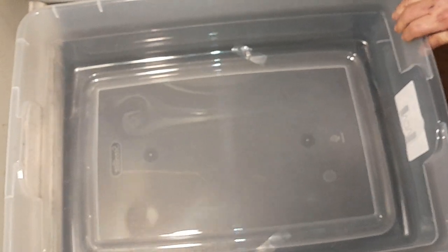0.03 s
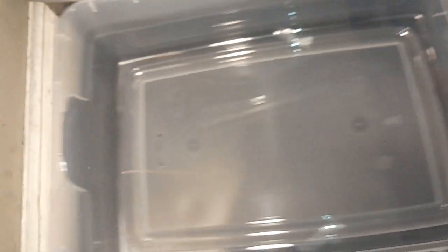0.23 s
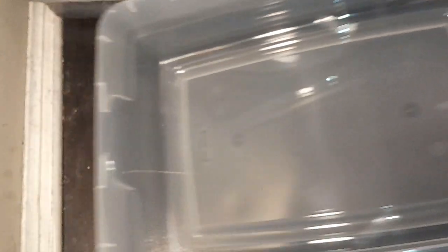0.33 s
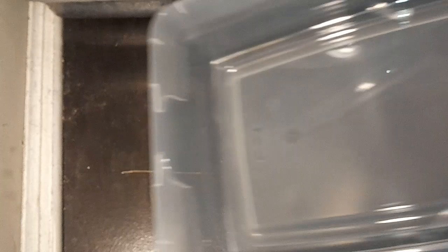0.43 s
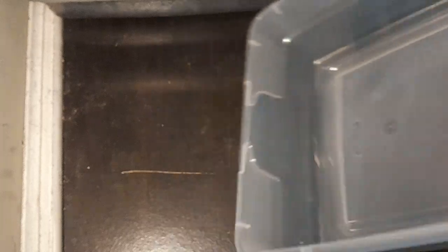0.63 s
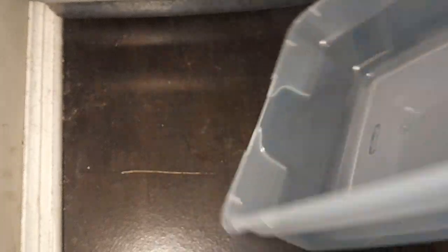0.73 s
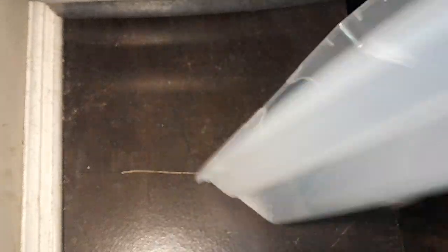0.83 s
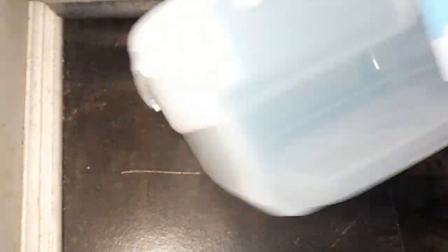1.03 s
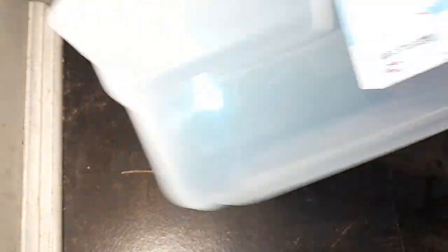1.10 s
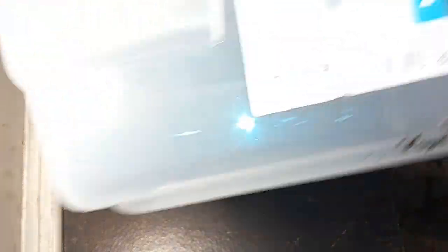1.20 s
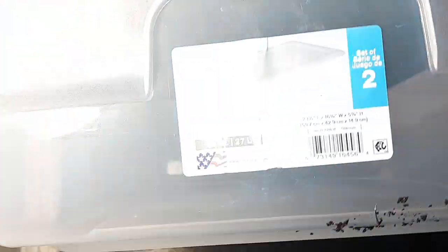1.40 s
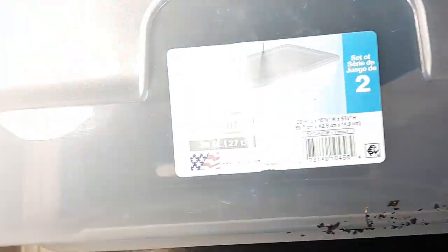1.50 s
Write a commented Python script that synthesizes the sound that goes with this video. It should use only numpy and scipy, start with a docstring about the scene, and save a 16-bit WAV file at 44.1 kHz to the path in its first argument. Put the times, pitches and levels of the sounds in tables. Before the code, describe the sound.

Hard plastic tub bumps loose, rubs with a gritty scrape and low shudder, then thuds twice.

```python
"""Plastic bin dragged and tipped

A large thin plastic bin bumps free of a hard surface close to two microphones and is turned on its side.
Bumps and two hollow knocks ring its panel modes; its base scrapes as dense, gritty noise grains.
Coarser catches rub the walls and boom the floor panel; a wall judders in stick-slip near 200 Hz.
Small settling rubs follow, with short room reflections over a quiet noise bed."""
import sys
import numpy as np
from scipy import signal
from scipy.fft import rfft, irfft, next_fast_len
from scipy.io import wavfile
from scipy.ndimage import map_coordinates

SR = 44100
rng = np.random.default_rng(int(sys.argv[2]) if len(sys.argv) > 2 else 0)


def store_wav(level_fs):
    """Save 16-bit WAV to argv[1]."""
    pcm = np.round(np.clip(np.atleast_2d(level_fs), -1, 1) * 32767)
    wavfile.write(sys.argv[1], SR, pcm.T.astype(np.int16))


def elevation(decibels):
    """Turn decibel levels (scalar or array-like) into linear amplitude ratios."""
    levels = np.asarray(decibels, float)
    return 10 ** (levels / 20)


N = 68355  # samples

# Room tone spectrum: f/Hz, relative level/dB
ROOM_TONE = [(18, -35), (30, 12), (59, 6.5), (321, -19), (785, -1), (2080, -22), (7750, -12), (16200, -50)]
# Brief dips of the room tone: t/s, width/s, level/dB
ROOM_TONE_DIPS = [(0.057, 0.028, -20), (.848, 0.0071, -11)]
ROOM_TONE_DB = -61.5
# Room decay: f/Hz, t60/s
ROOM_DECAY = [(100, 0.33), (1000, 0.22), (10000, 0.34)]
ROOM_DB = -11

# Left-right likeness: f/Hz, correlation (0 to 1)
LIKENESS = [(60, 0.99), (200, 1), (500, 0.81), (1500, 0.052), (8000, 0.031)]
# Left over right: f/Hz, level/dB
LEFT_OVER_RIGHT = [(60, 3.2), (240, 3.2), (950, 4.5), (3770, 3), (15000, 1)]
# The bin crosses the microphones: t/s, left lag/s
LEFT_LAG = [(.1, -.0002), (.7, 0), (1.5, .0005)]
LOW_CUT_HZ, BAND_END_HZ = 30, 15750

# The bin's panel modes, lowest first: f/Hz, relative level/dB, t60/s
PANEL_MODES = [(53.9, 0, 0.35), (81.7, 4, 0.27), (147, -0.5, 0.14), (193.2, 1.5, 0.061),
               (228.7, -2.5, 0.071), (352, -6, 0.081), (445.4, -10, 0.038), (560, -11.5, 0.027),
               (677.7, -7, 0.034), (927, -13.5, 0.033), (1070, -13, 0.032), (1225, -15.5, 0.021),
               (1470, -16, 0.011)]
FLOOR_MODES = 3  # this many of the lowest modes carry the boom
WALL_MODES_FROM = FLOOR_MODES + 1  # index of the first mode rubbed or juddered

# Wall rub, before its lumps: t/s, level/dB
WALL_RUB = [(0, -44.5), (.06, -62), (.14, -45.5), (.2, -52), (.3, -34), (.38, -43), (.43, -29), (.49, -42),
            (.535, -42.5), (.65, -41.5), (.76, -49.5), (.81, -76), (.84, -100), (.87, -31.5), (.91, -32),
            (.99, -49.5), (1.06, -37.5), (1.13, -57.5), (1.22, -47), (1.28, -44), (1.39, -62),
            (1.44, -68.5), (1.55, -101)]
RUB_TILT_DB, RUB_LUMPS_DB = 0.5, 2.5  # per octave; scale of the random level wander
# Floor panel boom, before its wander: t/s, level/dB
FLOOR_BOOM = [(0, -33.5), (.055, -44), (.08, -51), (.15, -54), (.2, -30.5), (.3, -31), (.5, -34.5),
              (.56, -24), (.65, -38.5), (.76, -34), (.8, -30), (.85, -41.5), (1.0, -40.5), (1.17, -43),
              (1.29, -43.5), (1.395, -48), (1.415, -75), (1.55, -83)]

# Base scrape, before its clumps: t/s, level/dB
SCRAPE_LEVEL = [(0, -60), (.065, -87.5), (.1, -56.5), (.185, -44), (.205, -87), (.25, -39.5), (.3, -31),
                (.39, -26), (.435, -24.5), (.47, -39), (.52, -46), (.64, -56), (.81, -56.5), (.835, -71.5),
                (.862, -88), (.9, -60), (.99, -52), (1.05, -53), (1.13, -60.5), (1.21, -52.5), (1.28, -54),
                (1.4, -64.5), (1.55, -77)]
# Grit colour: f/Hz, relative level/dB
GRIT_COLOUR = [(180, -56.5), (440, -12), (888, -13.5), (1100, -11.5), (3000, -14), (4200, -18), (7520, -14),
               (9340, -29.5), (13000, -19), (16200, -23)]
# Sheet resonances under the scrape: f/Hz, width/Hz, level/dB
SHEET_RESONANCES = [(444, 30, 15), (1081, 64, 9.5), (1497, 40, 5.5), (2170, 130, 6), (2680, 40, 6),
                    (3660, 690, 3.5)]
GRAINS_PER_S, GRAIN_SPREAD_DB = 15000, 3.5
# The top fizz follows the scrape level less steeply: offset, then dB of fizz per dB of scrape
FIZZ_HZ, FIZZ_DB, FIZZ_FOLLOWS = 11900, -35.5, 0.44

# Stick-slip before jitter and scatter: t/s, slip rate f/Hz, level/dB
JUDDER_PATH = [(.485, 205, -23), (.5, 215.7, -22), (.528, 245.1, -17.5), (.56, 200, -19), (.6, 213.9, -22),
               (.64, 189.5, -25), (.69, 195.6, -27), (.74, 240.6, -25.5), (.78, 207.1, -27.5),
               (0.819, 228.8, -30), (0.836, 220, -47)]
SLIP_JITTER, SLIP_SCATTER_DB = 0.15, 3.2  # scales of the rate (fraction) and level wander
SLIP_RING_DB, SLIP_FIZZ_DB = -8, -52  # ring relative to the judder level; fizz before its wander
SLIP_SOFT_HZ = 580

# Knocks: t/s, level/dB, tilt/(dB per octave), struck part f/Hz, crack level/dB, hand stops it after t/s
BLOWS = [(0.183, -33.5, 4.5, 450, 1, 0.032), (0.212, -25.5, 4, 147, 5, 0.045),
         (0.239, -29.5, 5.5, 147, 3, 0.02), (.526, -40.5, 5.5, 550, 1, 0.038),
         (0.8679, -23.5, 6.5, 1250, -0.5, 0.024), (0.87, -20, 0.5, 192, -4.5, 0.3),
         (1.008, -17.5, 0.5, 863, -8, 0.096), (1.021, -23.5, 2.5, 202.5, -16.5, 0.15),
         (1.266, -38, 3, 1470, -4, 0.039)]
# Crack colour: f/Hz, relative level/dB
CRACK_COLOUR = [(240, -80), (450, -3), (1200, -9.5), (2500, -11.5), (4000, -21), (7500, -23.5), (9500, -34),
                (16000, -34)]
CRACK_T60, CRACK_RING_DB = 0.082, 11.5  # s; lift of the panel modes in the crack's colour
STOP_S, SWELL_CYCLES = 0.0062, 0.35  # time constants of the hand's damping and of each mode's swell
WALL_DB, WALL_OCTAVES = 15, 0.17  # modes near the struck wall ring louder


def unit(x):
    """Scales a signal to rms 1."""
    return x / np.sqrt(np.mean(x ** 2) + 1e-20)


def along(points, hz):
    """Reads (Hz, value) points on a log frequency axis."""
    f, value = np.transpose(points)
    return np.interp(np.log(hz + 1), np.log(f + 1), value)


def curves(rows):
    """One value per sample for each column after the time."""
    s, *columns = np.transpose(rows)
    return [np.interp(np.arange(N) / SR, s, column) for column in columns]


def wobble(rate):
    """A smooth random curve, rate knots a second."""
    knots = rng.standard_normal(int(N * rate / SR) + 4)
    return map_coordinates(knots, [np.arange(N) * rate / SR])


def noise_pair():
    """Two independent draws of white noise."""
    return rng.standard_normal((2, N))


def filtered(x, response):
    """Shapes x by a complex response of frequency."""
    size = next_fast_len(N + SR // 2)
    return irfft(rfft(x, size) * response(np.fft.rfftfreq(size, 1 / SR)), size)[..., :N]


def resonances(f, peaks):
    """Causal sum of (Hz, width Hz, dB) resonances, alternating in sign."""
    total = 0
    for k, (centre, width, db) in enumerate(peaks):
        damping = 1j * f * width
        total = total + (-1) ** k * elevation(db) * damping / (centre * centre - f * f + damping)
    return total


def width_hz(t60):
    """A mode's bandwidth: the faster it dies, the wider it is."""
    return np.log(1000) / np.pi / t60


def grains(per_s, spread_db):
    """Two draws of random tiny impacts of uneven size."""
    hits = rng.random((2, N)) < per_s / SR
    signs = rng.choice([-1, 1], (2, N))
    return hits * signs * elevation(spread_db * rng.standard_normal((2, N)))


def shaken(modes, force, tilt_db):
    """A force played into some of the bin's modes, tilted per octave about 200 Hz, rms 1."""
    peaks = [(hz, width_hz(t60), db + tilt_db * np.log2(hz / 200)) for hz, db, t60 in modes]
    return unit(filtered(force, lambda f: resonances(f, peaks)))


def room_tone():
    """A quiet bed of coloured noise whose level dips briefly."""
    t = np.arange(N) / SR
    dips_db = sum(db * np.exp(-((t - s) / width) ** 2) for s, width, db in ROOM_TONE_DIPS)
    bed = unit(filtered(noise_pair(), lambda f: elevation(along(ROOM_TONE, f))))
    return elevation(ROOM_TONE_DB + dips_db) * bed


def room(x):
    """Delayed noise tail in which each frequency dies at its own speed."""
    hz, t, z = signal.stft(rng.standard_normal((2, SR // 2)), SR, nperseg=256)
    decay = elevation(-60 * t / along(ROOM_DECAY, hz)[:, None])
    tail = signal.istft(z * decay, SR, nperseg=256)[1]
    tail = tail / np.linalg.norm(tail[0])
    delayed = np.pad(x, (300, 0))  # samples
    return signal.fftconvolve(delayed[None], tail, axes=1)[:, :N]


def pair(x):
    """Two microphones hear different parts of the big object: alike in the bass, unlike in the treble."""
    def mid_side_gains(f):
        turn = np.arccos(np.clip(along(LIKENESS, f), -1, 1)) / 2
        return np.array([np.cos(turn), np.sin(turn)])
    mid, side = filtered(x, mid_side_gains)
    half_lag = curves(LEFT_LAG)[0] * SR / 2
    left = map_coordinates(mid + side, [np.arange(N) - half_lag], mode="nearest")
    right = map_coordinates(mid - side, [np.arange(N) + half_lag], mode="nearest")
    return np.array([left, right])


def fizz():
    """Fine hiss at the top of the range, rms 1."""
    return unit(filtered(noise_pair(), lambda f: 1 / (1 + (FIZZ_HZ / (f + 1)) ** 8)))


def floor_boom():
    """Sparse coarse catches shake the floor panel's low modes."""
    panel = shaken(PANEL_MODES[:FLOOR_MODES], grains(400, 3), tilt_db=-2)
    return elevation(curves(FLOOR_BOOM)[0] + 0.79 * wobble(45)) * panel


def wall_rub():
    """Catches coarser than the grit shake the wall modes in lumps."""
    walls = shaken(PANEL_MODES[WALL_MODES_FROM:], grains(2500, 3.34), tilt_db=RUB_TILT_DB)
    return elevation(curves(WALL_RUB)[0] + RUB_LUMPS_DB * wobble(44.9)) * walls


def judder():
    """Stick-slip of a wall: an uneven cycle, each slip a soft kick of its own size into the wall modes."""
    hz, level_db = curves(JUDDER_PATH)
    t = np.arange(N) / SR
    start, end = JUDDER_PATH[0][0], JUDDER_PATH[-1][0]
    on = np.clip(np.minimum(t - start, end - t) / 0.0042, 0, 1)  # fades of 4.2 ms
    turns = np.cumsum(hz * (1 + SLIP_JITTER * wobble(120))) / SR
    cycle = np.array([np.sin(2 * np.pi * turns), np.cos(2 * np.pi * turns)])
    # one kick as each cycle passes, its moment a little uneven
    kicks = np.diff(np.floor(turns + 0.16 * wobble(300)), prepend=0) * rng.normal(0.11, 1, (2, N))
    soft_kicks = filtered(kicks, lambda f: 1 / (1 + (f / SLIP_SOFT_HZ) ** 4))
    ring = shaken(PANEL_MODES[WALL_MODES_FROM:], soft_kicks, tilt_db=1)
    body = elevation(SLIP_SCATTER_DB * wobble(69.32)) * cycle + elevation(SLIP_RING_DB) * ring
    sliding = elevation(SLIP_FIZZ_DB + 2.3 * wobble(30)) * fizz()
    return on * (elevation(level_db) * body + sliding)


def crack_noise():
    """Noise coloured by the panel modes, rms 1."""
    peaks = [(hz, width_hz(t60), db + CRACK_RING_DB) for hz, db, t60 in PANEL_MODES]
    colour = lambda f: elevation(along(CRACK_COLOUR, f)) * (1 + abs(resonances(f, peaks)))
    return unit(filtered(noise_pair(), colour))


def knocks():
    """Each blow rings all modes and cracks; the hand stops the ring."""
    out = np.zeros((2, N + SR))
    t = np.arange(SR // 4) / SR
    hz, mode_db, t60 = np.array(PANEL_MODES).T[:, :, None]
    noise = crack_noise()
    for s, db, tilt_db, struck_hz, crack_db, held in BLOWS:
        struck_db = WALL_DB * np.exp(-(np.log2(hz / struck_hz) / WALL_OCTAVES) ** 2)
        scatter_db = rng.normal(0, 1.5, hz.shape)
        start_db = mode_db + struck_db + tilt_db * np.log2(hz / 200) + scatter_db
        swell = 1 - np.exp(-t * hz / SWELL_CYCLES)
        stop = np.exp(-np.maximum(t - held, 0) / STOP_S)
        envelope = elevation(start_db - 60 * t / t60) * swell * stop
        # the second channel starts each mode at a random phase
        phases = (0, rng.random(hz.shape))
        ring = [np.sum(envelope * np.sin(2 * np.pi * (hz * t + phase)), 0) for phase in phases]
        first = rng.integers(N - len(t))
        crack = elevation(crack_db - 60 * t / CRACK_T60) * noise[:, first:first + len(t)]
        crack = crack * np.minimum(t / 0.0005, 1)  # 0.5 ms attack
        at = round(s * SR)
        out[:, at:at + len(t)] += elevation(db) * (ring + crack)
    return out[:, :N]


def scrape():
    """Dense grit under the base, coloured by the sheet's resonances, in clumps."""
    level_db, = curves(SCRAPE_LEVEL)
    colour = lambda f: elevation(along(GRIT_COLOUR, f)) * (1 + abs(resonances(f, SHEET_RESONANCES)))
    grit = unit(filtered(grains(GRAINS_PER_S, GRAIN_SPREAD_DB), colour))
    clumps_db = 2.0 * wobble(50) + 1.86 * wobble(200)
    return elevation(level_db + clumps_db) * grit + elevation(FIZZ_DB + FIZZ_FOLLOWS * level_db) * fizz()


def scene():
    """Bin near the microphones, its room and the room tone."""
    bin_sound = floor_boom() + wall_rub() + judder() + knocks() + scrape()
    return room_tone() + elevation(ROOM_DB) * room(bin_sound[0]) + pair(bin_sound)


def top_cut(x):
    """Nothing passes above the cut-off."""
    return signal.sosfilt(signal.butter(12, 16660, fs=SR, output="sos"), x)


def record(dry):
    """The microphones cut the deepest bass, the left is more sensitive; the band ends steeply at the top."""
    def response(f):
        balance = elevation(along(LEFT_OVER_RIGHT, f) / 2 * np.array([[1], [-1]]))
        low_cut = (1j * f / (LOW_CUT_HZ + 1j * f)) ** 2
        band_end = 1 / (1 + (f / BAND_END_HZ) ** 200)
        return balance * low_cut * band_end
    return top_cut(filtered(dry, response))


dry = scene()
out = record(dry)
store_wav(out)
```